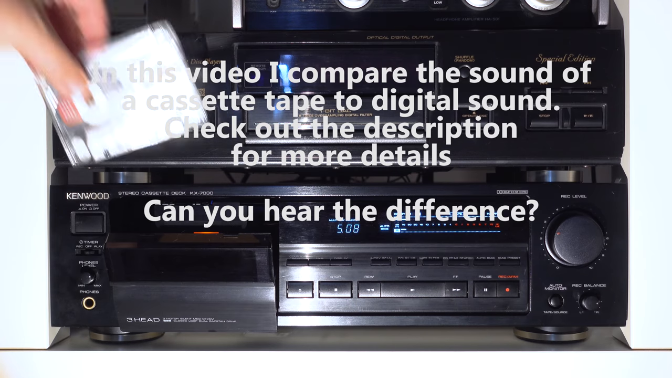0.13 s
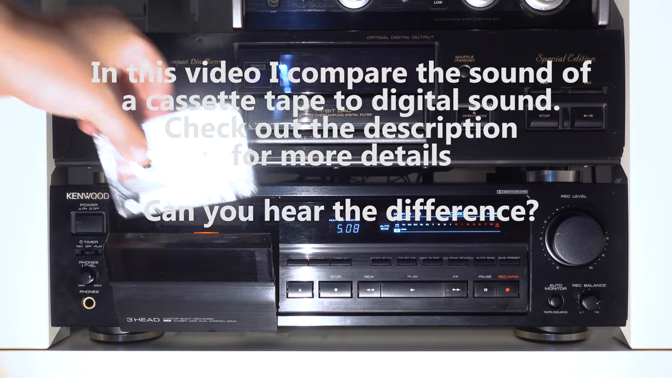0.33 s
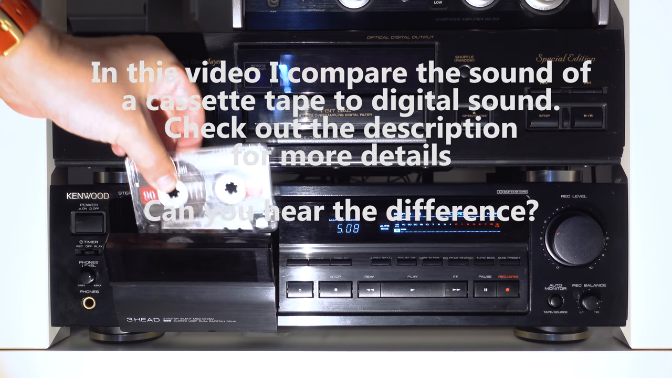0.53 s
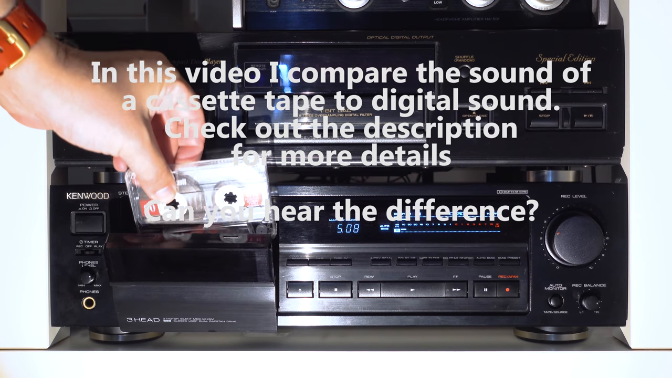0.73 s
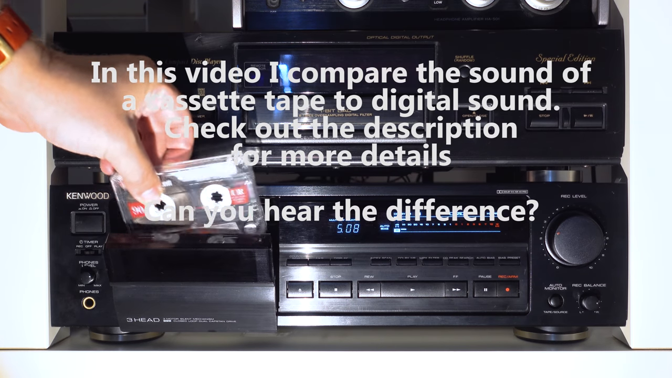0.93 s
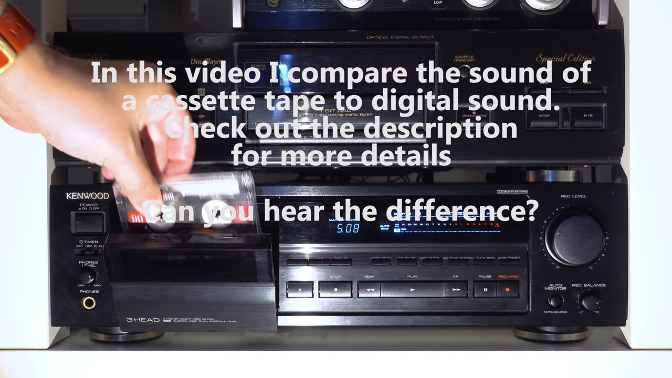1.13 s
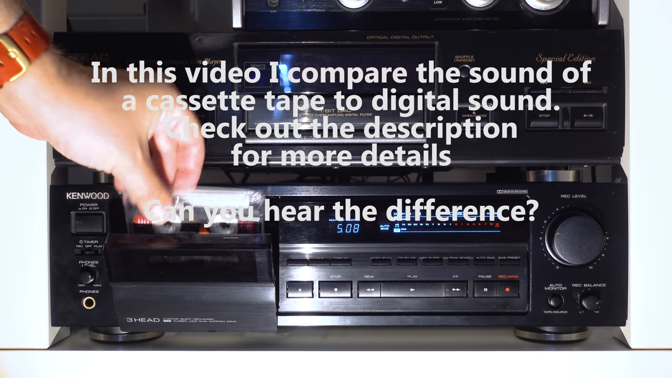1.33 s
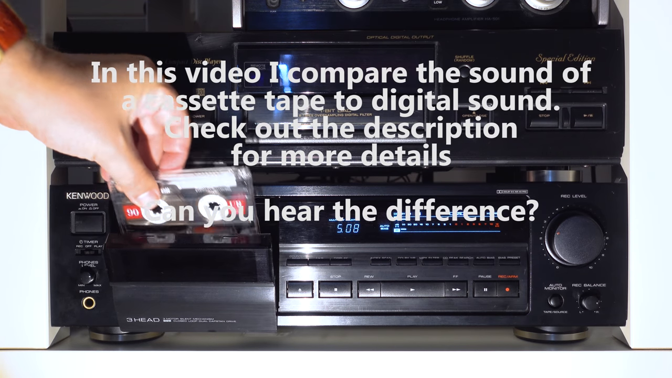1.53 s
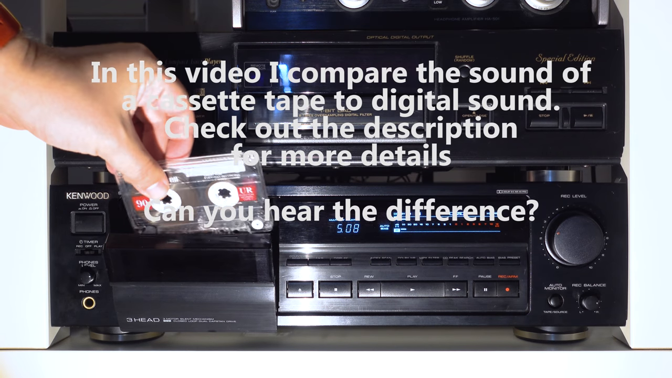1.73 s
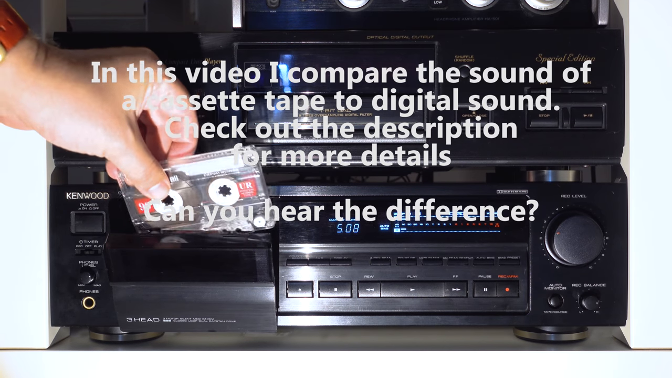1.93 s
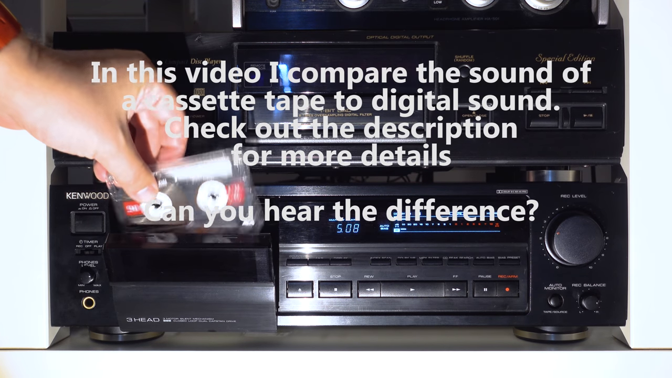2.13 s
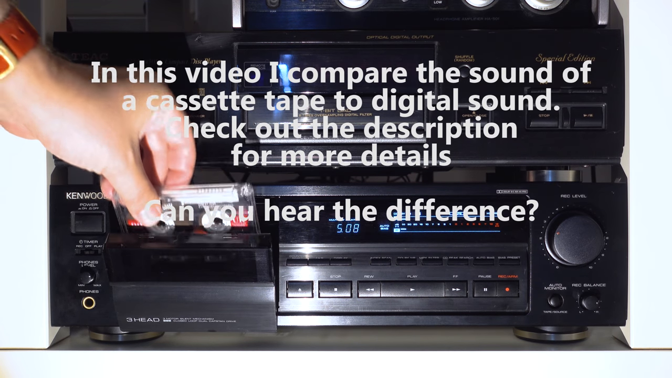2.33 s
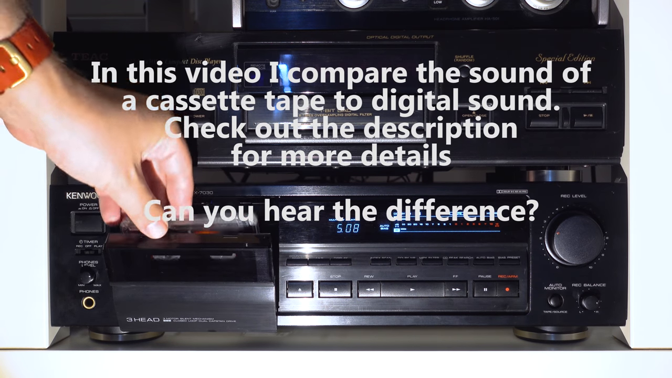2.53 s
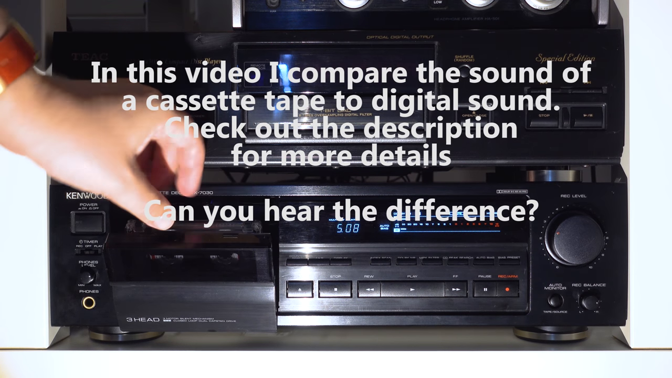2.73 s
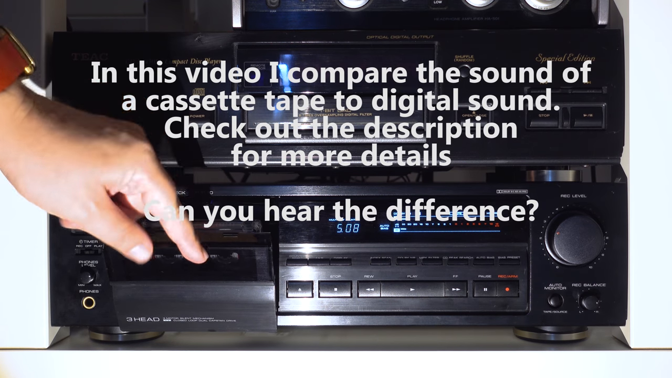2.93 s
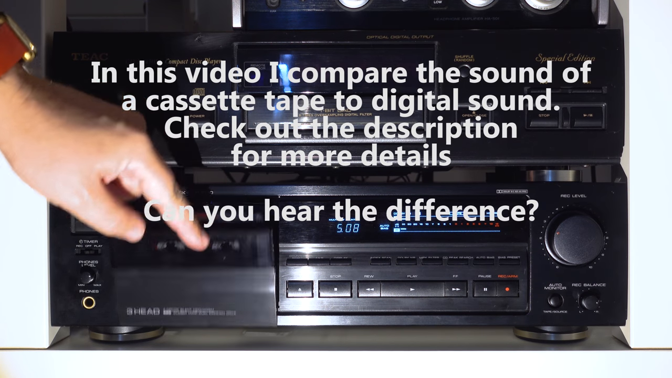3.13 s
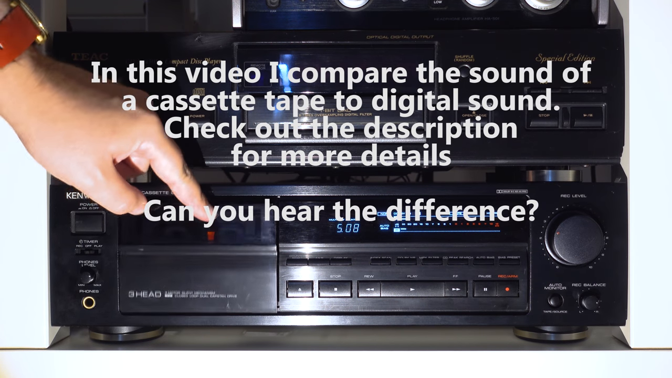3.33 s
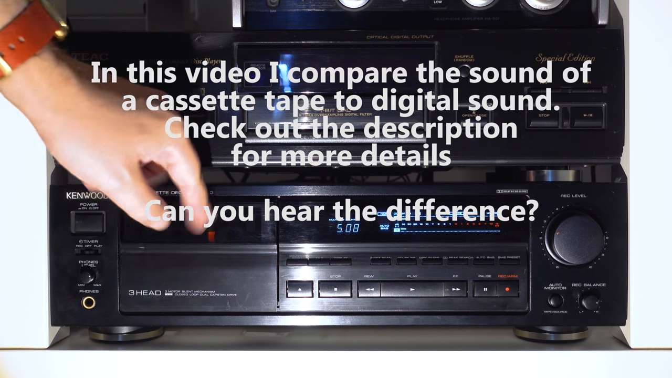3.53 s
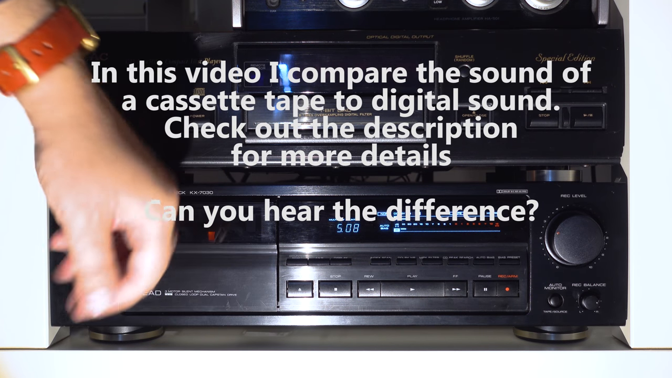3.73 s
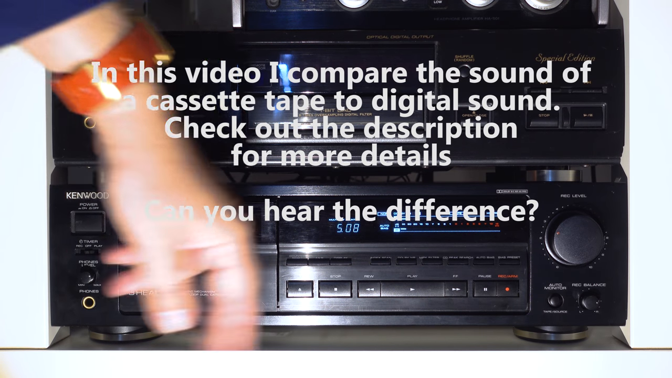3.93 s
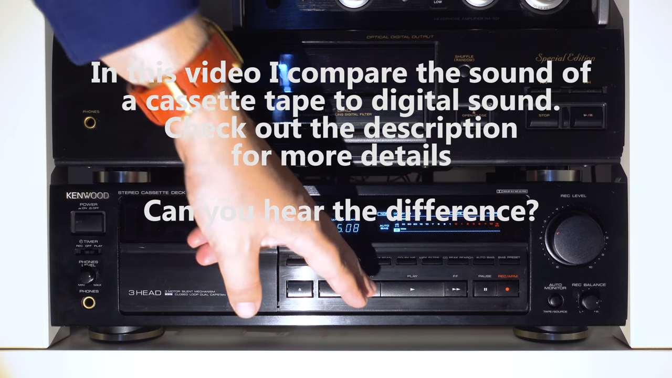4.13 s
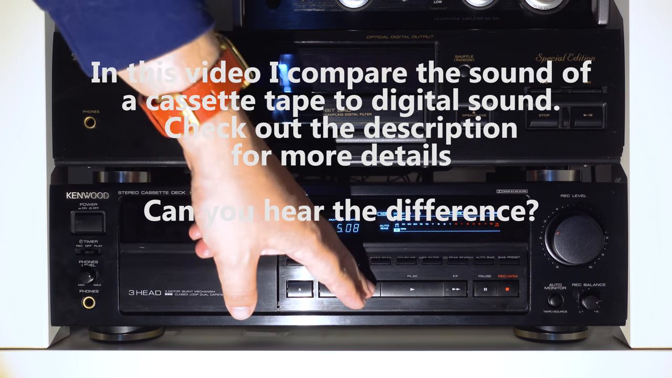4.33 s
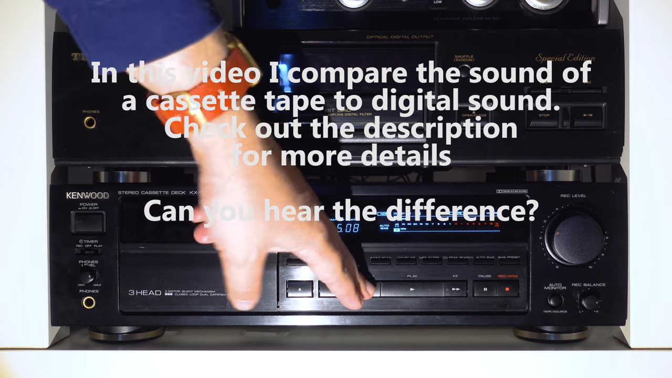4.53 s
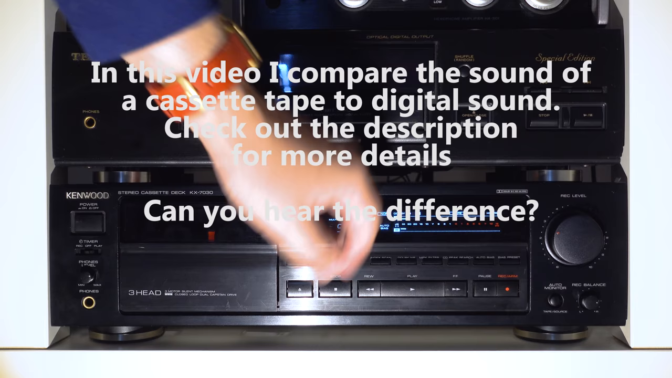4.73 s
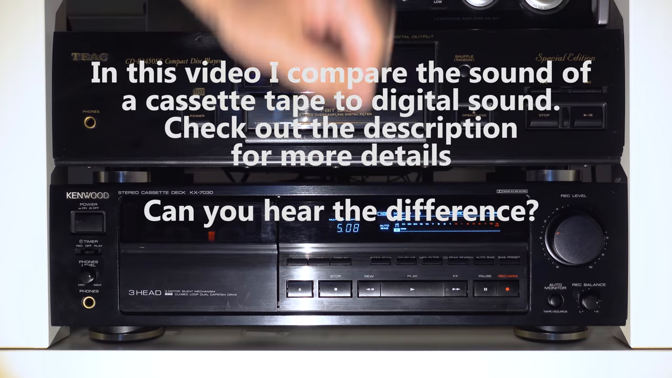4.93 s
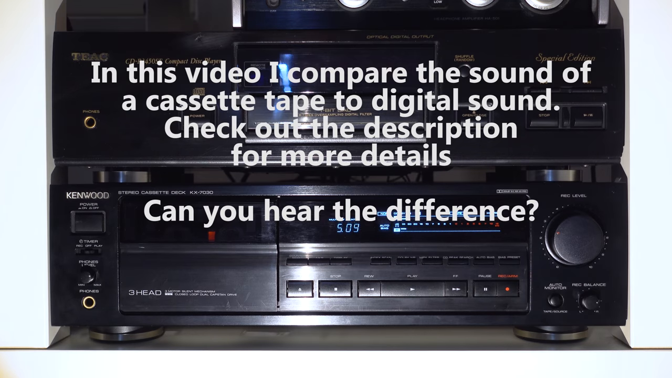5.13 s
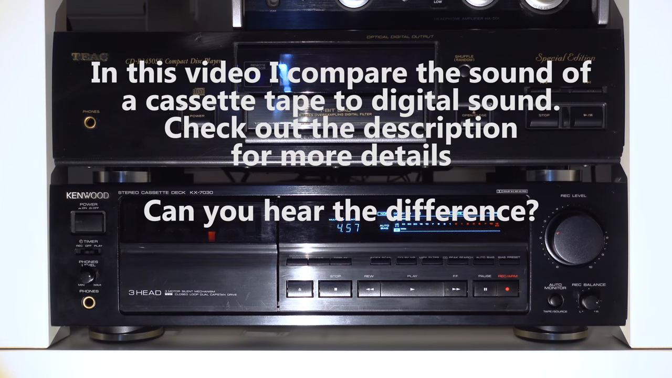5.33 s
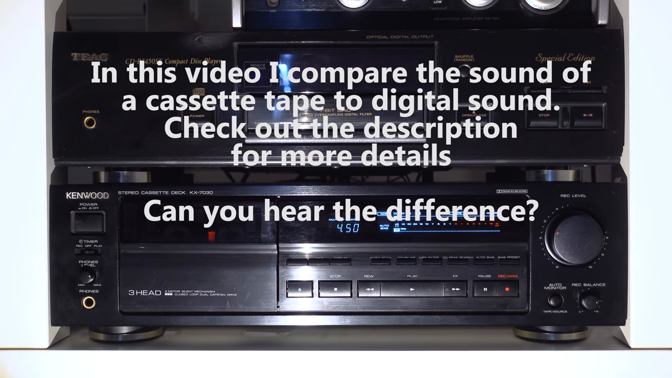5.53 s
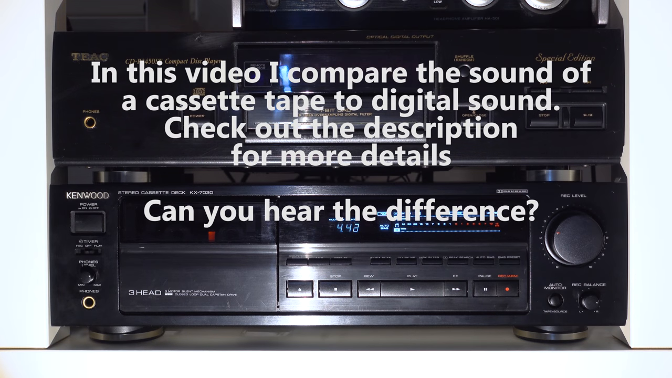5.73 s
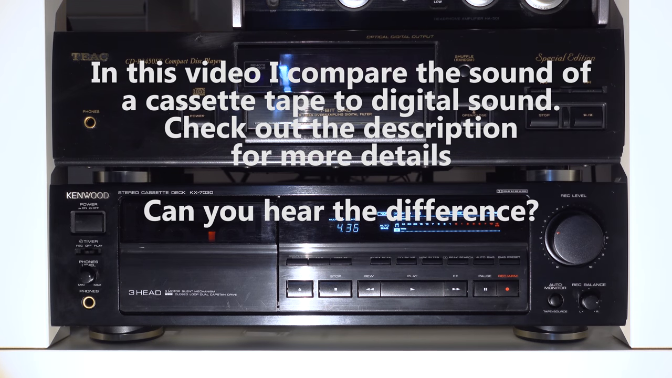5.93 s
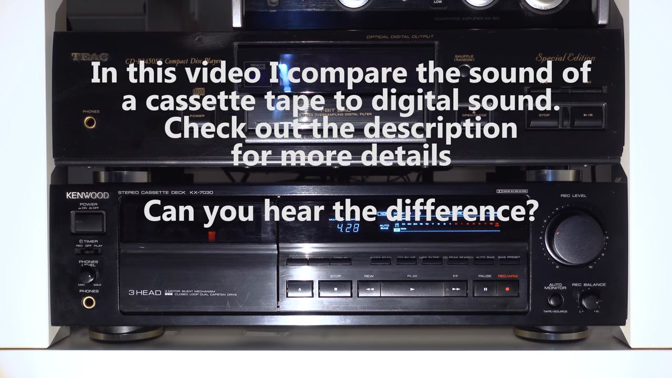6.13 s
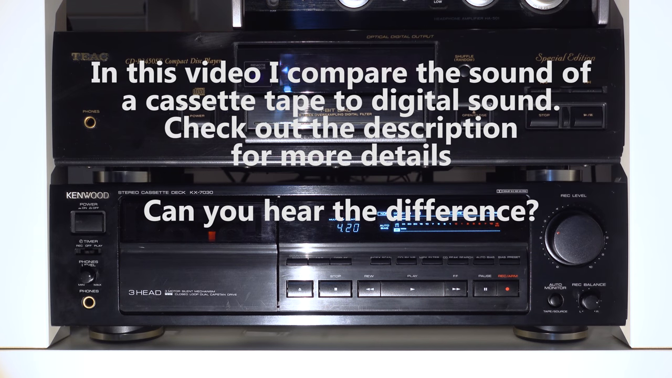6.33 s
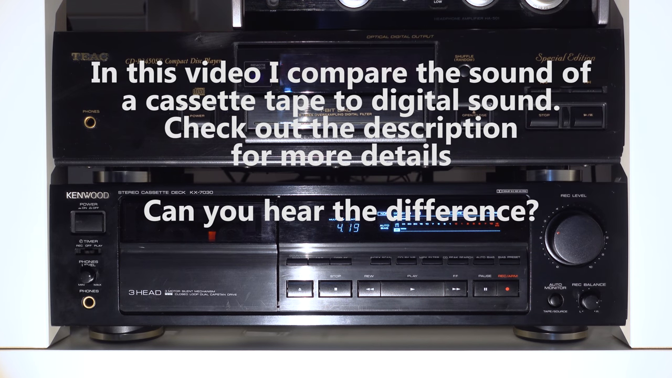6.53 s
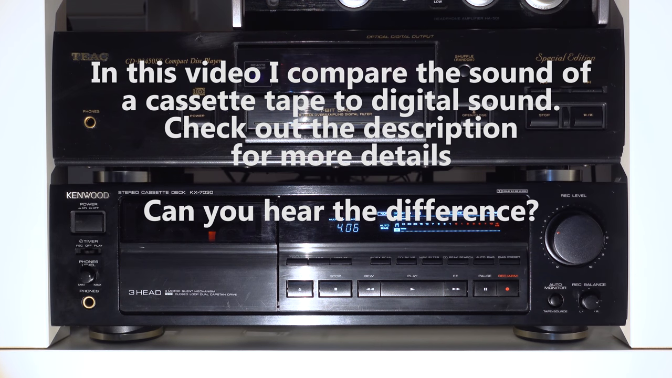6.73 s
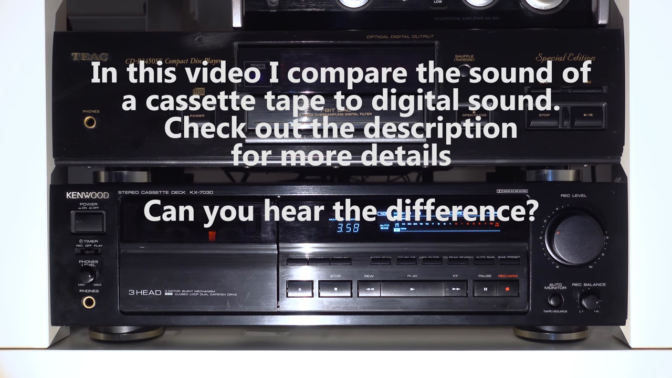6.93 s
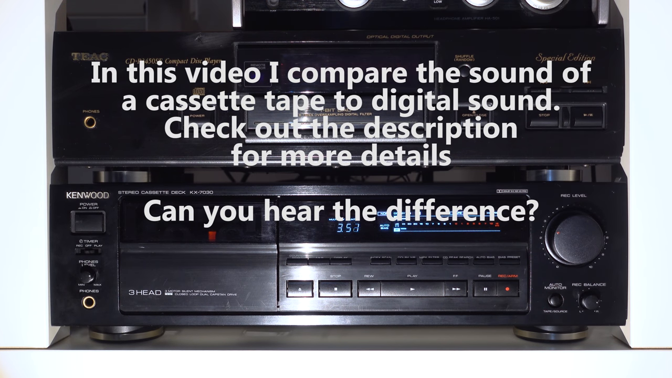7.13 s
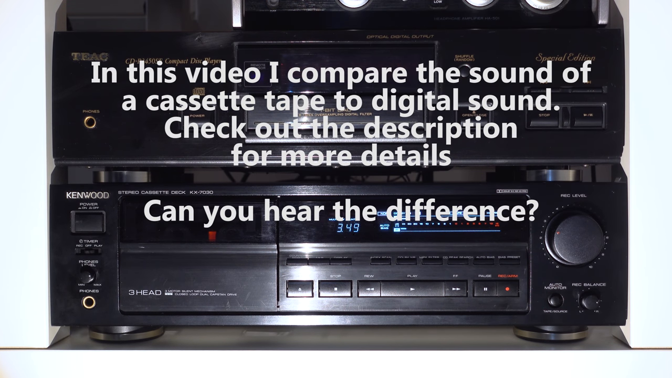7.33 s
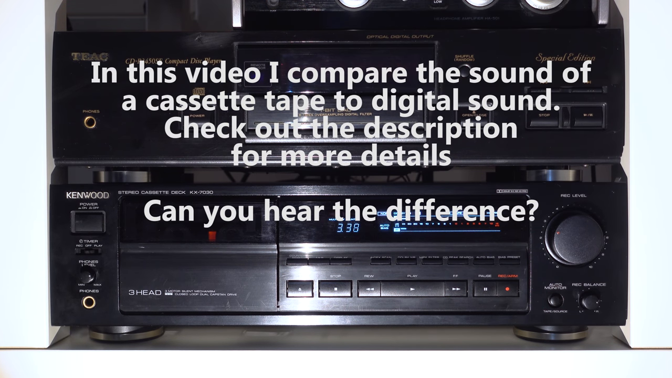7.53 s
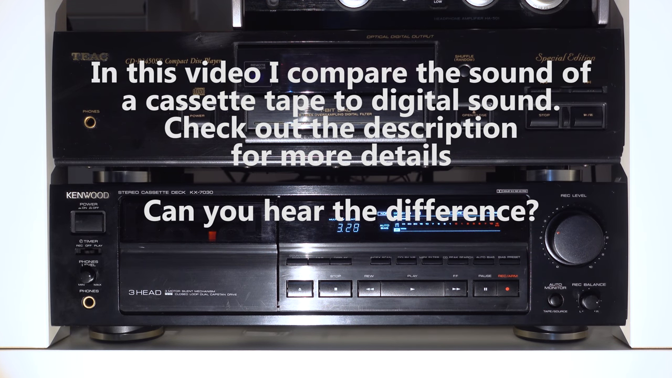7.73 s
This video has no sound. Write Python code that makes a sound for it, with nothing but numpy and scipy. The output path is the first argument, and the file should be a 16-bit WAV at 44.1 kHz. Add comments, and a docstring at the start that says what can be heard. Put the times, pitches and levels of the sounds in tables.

```python
"""Over a low room rumble, plastic scrapes, squeaks and knocks: a cassette is fumbled into a tape deck
in a bare, echoing room, heard at two close microphones; the door is pushed shut and its case rings.
A key clicks, the starting motor growls and the tape rewinds: gear teeth rattle, the loose reel knocks,
the tape swishes and sings, the motor groans, then hums. Blows are bursts of noise through resonances,
rubs and rattles are random tiny contacts in coloured filters, and whines, groan and hum are sines."""
import sys
import numpy as np
from scipy import signal
from scipy.fft import rfft, irfft, next_fast_len
from scipy.io import wavfile
from scipy.ndimage import uniform_filter1d

SR = 44100
rng = np.random.default_rng(int(sys.argv[2]) if len(sys.argv) > 2 else 0)


def materialize(psi):
    """Save the field psi as 16-bit PCM at rate SR to the path in sys.argv[1].

    A 1-D psi becomes a single channel; in a 2-D psi each row is a channel.
    """
    bounded = np.clip(np.atleast_2d(psi).T, -1, 1)
    quanta = np.round(bounded * 32767).astype(np.int16)
    wavfile.write(sys.argv[1], SR, quanta)


N = 343098
TIME = np.arange(N) / SR

# colour of the plastic shell, knocked or scraped: (f/Hz, relative level/dB)
SHELL_COLOUR = [(71, -64), (120, -24), (216, -10.5), (398, -14.5), (649, -4.5), (881, -8.5), (1690, -2),
                (2030, -8.5), (3730, -16), (5060, -23), (7160, -25), (15500, -37.5)]

# the motor runs up to speed, then creeps faster as the reel fills
MOTOR_START_S, SPIN_UP_S, CREEP_PER_S, FULL_SPEED_S = 4.99, 0.15, 0.014, 7.0
# the rattle, flicks and whines grow as a power of the run-up
WIND_DB, WIND_POWER = -35, 1.53


def amp(db):
    """Decibels to gain."""
    return np.exp(np.asarray(db) * (np.log(10) / 20))


def unit(x):
    """Scale to rms 1."""
    return x / np.sqrt(np.mean(x ** 2) + 1e-20)


def at_hz(points, hz):
    """Read a table on a log-frequency axis."""
    points = np.array(points)
    return np.interp(np.log(np.maximum(hz, 1)), np.log(points[:, 0]), points[:, 1])


def add(out, s, x):
    """Mix x into out from time s."""
    i = min(max(int(s * SR), 0), N)
    out[i:i + len(x)] += x[:N - i]


def cut(x, hz, kind, order=2):
    """Butterworth filter."""
    return signal.sosfilt(signal.butter(order, hz, kind, fs=SR, output="sos"), x)


def colour(x, spectrum, size=4096):
    """Causal (minimum-phase) filter with the given spectrum."""
    cepstrum = irfft(np.log(amp(at_hz(spectrum, np.fft.rfftfreq(size, 1 / SR)))))
    # fold the cepstrum onto positive time
    cepstrum[1:size // 2] *= 2
    cepstrum[size // 2 + 1:] = 0
    response = irfft(np.exp(rfft(cepstrum)))
    return signal.fftconvolve(x, response)[:len(x)]


def resonate(x, modes):
    """Parallel two-pole resonances, each with its gain on top."""
    out = 0
    for hz, width, db in modes:
        r = np.exp(-np.pi * width / SR)
        poles = [1, -2 * r * np.cos(2 * np.pi * hz / SR), r * r]
        out = out + amp(db) * (1 - r * r) / 2 * signal.lfilter([1, 0, -1], poles, x + 1e-18)
    return out


def narrow_noise(size, hz, width):
    """Noise through two resonances at one pitch, the second twice as wide; rms 1."""
    rung = resonate(rng.standard_normal(size), [(hz, width, 0)])
    return unit(resonate(rung, [(hz, 2 * width, 0)]))


def drift(rate):
    """Slow chance: random knots at the given rate per second, joined by lines; rms 1."""
    knots = rng.standard_normal(int(N / SR * rate) + 2)
    return unit(np.interp(TIME * rate, np.arange(len(knots)), knots))


def grains(per_s, spread_db):
    """Random tiny contacts of uneven size."""
    out = np.zeros(N)
    born = np.flatnonzero(rng.random(N) < per_s / SR)
    chance = rng.uniform(-1, 1, len(born))
    size_db = spread_db * np.minimum(-np.log(np.abs(chance)), 4)
    out[born] = np.sign(chance) * amp(size_db)
    return out


def stroke(start_s, length_s, attack_s, release_s):
    """Envelope: a straight rise, held until length_s is over, then a dying away."""
    t = TIME - start_s
    return np.clip(t / attack_s, 0, 1) * np.exp(-np.clip((t - length_s) / release_s, 0, 20))


def diffuse(size):
    """Sound from all sides at two close microphones: alike in the bass, unrelated in the treble."""
    # likeness of the two microphones: (f/Hz, left-right correlation)
    likeness = [(100, 0.99), (300, 0.99), (700, 0.84), (1400, 0.74), (2800, 0.38), (5000, 0.033),
                (15000, .05)]
    alike = np.clip(at_hz(likeness, np.fft.rfftfreq(size, 1 / SR)), -1, 1)
    mid, side = rfft(rng.standard_normal((2, size)))
    return irfft(np.sqrt(1 + alike) * mid + np.sqrt(1 - alike) * side * [[1], [-1]], size)


def room_response(build_s=0.0041, size=44100):
    """Echoes thicken over a few milliseconds and die away band by band."""
    # how long the room rings: (f/Hz, T60/s)
    room_t60 = [(100, 0.74), (250, 0.86), (600, 0.45), (1300, 0.83), (3000, 0.71), (6000, 0.72),
                (11000, 0.52), (16000, 0.34)]
    # colour of the echoes: (f/Hz, relative level/dB)
    room_gain = [(100, 2), (250, 5.5), (600, 2.5), (1500, -2), (4000, -0.5), (8000, -4), (15000, -2.5)]
    t, hz = np.arange(size) / SR, np.fft.rfftfreq(size, 1 / SR)
    field = rfft(diffuse(size)) * amp(at_hz(room_gain, hz))
    out = 0
    for k, (_, t60) in enumerate(room_t60):
        # bands overlap as triangles on the log-frequency axis
        share = at_hz([(row[0], j == k) for j, row in enumerate(room_t60)], hz)
        fade = amp(-60 * t / t60) * (1 - np.exp(-t / build_s))
        out = out + irfft(field * share, size) * fade / np.sqrt(2 * np.sum(fade ** 2))
    return out


def place(x, room, wet_db, lag, pan_db, wall_db, wall_s=0.00111):
    """Direct sound (lag in samples on the right), bright sideways echoes from the cabinet, and the room."""
    taps = np.arange(-8, 9)
    late = np.convolve(x, np.sinc(taps - lag) * np.hanning(len(taps)), "same")
    wall = amp(wall_db) * np.roll(cut(x, [3500, 10000], "band"), int(wall_s * SR))
    sides = np.array([[1], [-1]])   # left, right
    near = np.array([x, late]) * amp(sides * pan_db / 2) + sides * wall
    echoes = signal.fftconvolve(room.astype("f"), x[None].astype("f"), axes=1)[:, :N]
    return near + amp(wet_db) * echoes


def room_air():
    """Broad, coloured noise of the room, from all sides."""
    # colour of the quiet room: (f/Hz, relative level/dB)
    quiet = [(15, -51), (25, -14.5), (75, -10), (101, -12.5), (122, -16), (156, -16), (193, -19),
             (227, -14.5), (281, -24.5), (457, -25), (684, -31.5), (871, -22.5), (1450, -32.5),
             (1710, -32.5), (15500, -48.5)]
    field = diffuse(next_fast_len(N, True))
    air = [cut(colour(side[:N], quiet), 53, "high", order=3) for side in field]
    return amp(-54.5) * unit(np.array(air))


def room_hums():
    """Low standing hums: narrow bands of noise, the same at both microphones."""
    # hums of the room: (f/Hz, width/Hz, level/dB)
    hum_bands = [(33.8, 6.3, -70.5), (70.8, 3.1, -57.5), (221.6, 9.6, -67.5), (900, 330, -106)]
    return sum(amp(db) * narrow_noise(N, hz, width) for hz, width, db in hum_bands)


def slides():
    """Fingers slide the shell along the holder: grains of contact under short strokes of pressure."""
    # strokes along the holder and home: (t/s, length/s, level/dB)
    slide_strokes = [(0.004, 0.15, -58.5), (0.666, 0.17, -52), (1.408, 0.5, -53.5), (2.943, 0.14, -59),
                     (3.257, 0.37, -48.5)]
    pressure = sum(amp(db) * stroke(s, length, attack_s=0.018, release_s=0.13)
                   for s, length, db in slide_strokes)
    return pressure * unit(colour(grains(700, 0.63), SHELL_COLOUR))


def squeaks(size=16384):
    """Stick and slip rings one resonance of a plastic part for a moment."""
    # rubs and squeaks of plastic: (t/s, length/s, f/Hz, width/Hz, level/dB ahead of the arch)
    rubs = [(0.032, 0.14, 1710, 150, -53.5), (0.045, 0.0077, 1560, 675, -40.5),
            (1.16, 0.035, 2330, 350, -47), (1.189, 0.11, 1430, 300, -48), (1.2, .012, 8560, 1800, -49),
            (1.259, 0.009, 8800, 1800, -47), (1.234, .13, 8950, 1200, -67),
            (1.859, 0.0068, 1670, 403, -23.5), (2.253, 0.013, 3730, 496, -30.5),
            (2.437, 0.02, 3830, 457, -53), (2.538, 0.057, 1840, 120, -35.5),
            (3.368, 0.031, 1690, 500, -35.5), (4.642, 0.012, 5200, 600, -47.5),
            (4.781, 0.017, 2710, 600, -50)]
    out, t = np.zeros(N), np.arange(size) / SR
    for s, length, hz, width, db in rubs:
        arch = np.sin(np.pi * np.minimum(t / length, 1))
        add(out, s, amp(db) * narrow_noise(size, hz, width) * arch)
    return out


def chatter(t60, rise_s, size=6144, uneven=0.86):
    """One blow: loose plastic parts buzz together for a moment, favouring some pitches by chance."""
    t = np.arange(size) / SR
    fade = amp(-60 * t / t60) * (1 - np.exp(-t / rise_s))
    pitches = rfft(rng.standard_normal(size) * fade)
    # a power below 1 evens out the chance pitches a little
    buzz = irfft(np.abs(pitches) ** uneven * np.exp(1j * np.angle(pitches)))
    loudness = np.sqrt(np.abs(uniform_filter1d(buzz ** 2, size=192)) + 1e-12)
    return fade * buzz / loudness


def blows(hits, spectrum, modes, ring_db, rise_s, thud_db, clack_db, crack_db):
    """Each blow rings the part's modes and the spot it lands on, with its own thud, clack and crack."""
    out = np.zeros(N)
    for s, blow_db, thud, crack, t60, spot_hz in hits:
        contact = chatter(t60, rise_s)
        rings = amp(ring_db) * resonate(contact, modes) + resonate(contact, [(spot_hz, 120, 5)])
        body = colour(contact + rings, spectrum)
        bands = ((cut(body, 450, "low", order=4), thud + thud_db),
                 (cut(body, [450, 4000], "band"), clack_db),
                 (cut(body, 4000, "high", order=4), crack + crack_db))
        for band, db in bands:
            add(out, s, amp(blow_db + db) * unit(band))
    return out


def shell_knocks():
    """The plastic shell knocks against the holder and rings its own modes."""
    # knocks: (t/s, relative level/dB, thud trim/dB, crack trim/dB, contact T60/s, struck spot f/Hz)
    knocks = [(0.047, -33.5, -37, -20, 0.03, 1620), (0.128, -39.5, -20, -23, 0.039, 1580),
              (0.638, -14, -18.5, -19, 0.046, 1500), (0.691, -19.5, -18.5, -19.5, 0.076, 1440),
              (0.838, -20.5, -19, -13.5, 0.055, 2470), (0.978, -21.5, -15.5, -15, 0.046, 1830),
              (1.003, -24, -12, -14, 0.046, 945), (1.048, -27.5, -26, -18, 0.038, 1440),
              (1.165, -29, -33, -20, 0.17, 2330), (1.205, -35.5, -15.5, -20, 0.047, 1760),
              (1.262, -31.5, -24, -14, 0.031, 1790), (1.473, -26, -19.5, -15.5, 0.06, 1030),
              (1.51, -28, -27, -20, 0.03, 1030), (1.537, -25.5, -46, -18, 0.038, 1490),
              (1.615, -32.5, -9.5, -18.5, 0.04, 1430), (1.776, -27, -28, -25, 0.034, 1790),
              (1.789, -14.5, -21.5, -14, 0.12, 1630), (1.8, -14.5, -22, -31, 0.046, 1000),
              (1.836, -23, -16, -13, 0.045, 1740), (1.862, -26, -41, -13, 0.028, 1650),
              (2.133, -27, -17, -21.5, 0.077, 1010), (2.154, -21, -14.5, -17, 0.091, 1740),
              (2.233, -24, -25, -14.5, 0.13, 1025), (2.253, -9, -28, -13.5, 0.07, 1770),
              (2.267, -17, -17.5, -34, 0.026, 1660), (2.442, -34.5, -10, -2.5, 0.032, 3850),
              (2.53, -23.5, -27, -18, 0.11, 1800), (2.544, -16, -21, -18, 0.12, 1820),
              (2.567, -18, -22, -22, 0.025, 1770)]
    # resonances of the shell: (f/Hz, width/Hz, relative level/dB)
    modes = [(669, 6, -10.5), (1117, 96, -4), (1500, 29, -0.5), (1660, 150, -14.5), (2300, 290, -4.5),
             (2900, 190, -10), (3750, 44, -21), (6630, 200, -15)]
    return blows(knocks, SHELL_COLOUR, modes, ring_db=5.5, rise_s=0.00073,
                 thud_db=-17.5, clack_db=-23, crack_db=-14)


def door_blows():
    """The door takes the cassette, swings and latches, each blow ringing its modes."""
    # blows: (t/s, relative level/dB, thud trim/dB, crack trim/dB, contact T60/s, struck spot f/Hz)
    door_hits = [(2.767, -9, -21.5, -17, 0.057, 1780), (2.802, -16, -13.5, -20, 0.077, 900),
                 (3.029, -29, -16.5, -24, 0.041, 1630), (3.054, -42.5, -24.5, -2, 0.024, 1500),
                 (3.285, -39.5, -6, -11, 0.085, 1100), (3.333, -18.5, -21, -19.5, 0.091, 1150),
                 (3.378, -34, -29, -8, 0.035, 1800), (3.461, -8.5, -34, -18.5, 0.037, 1130),
                 (3.470, -15.5, -18.5, -5.5, 0.052, 2730), (3.497, -13.5, -14.5, -20, 0.12, 1240)]
    # colour of the door: (f/Hz, relative level/dB)
    spectrum = [(53, -50), (90, -11.5), (154, -15.5), (264, -8.5), (335, -10.5), (586, -11.5), (639, -7),
                (727, -5), (1170, -3.5), (1360, -6), (2090, -8.5), (11000, -19.5), (15500, -29)]
    # resonances of the door: (f/Hz, width/Hz, relative level/dB)
    modes = [(270, 50, 0), (641.5, 23, 1.5), (1200, 43, -12), (1770, 870, -6), (3270, 190, -8.5),
             (3780, 51, -14), (4570, 92, -20), (5460, 240, -36), (6030, 220, -13), (7400, 170, -16)]
    return blows(door_hits, spectrum, modes, ring_db=4.5, rise_s=0.0022,
                 thud_db=-13, clack_db=-21, crack_db=-11)


def steel_case(swell_s=0.0067):
    """The two hardest blows set the steel case panels swelling and ringing on as decaying sines."""
    # the blows: (t/s, relative level/dB)
    case_blows = [(2.772, -5), (3.468, -0.5)]
    # modes of the case: (f/Hz, relative level/dB, T60/s)
    case_modes = [(145, -69, 0.52), (188.7, -28.5, 0.33), (255.4, -48, 0.53), (268, -25, 0.3),
                  (300, -36, 0.67), (1130, -34.5, 0.99), (1204, -29, 0.63)]
    out, t = np.zeros(N), np.arange(SR) / SR
    for s, blow_db in case_blows:
        for hz, db, t60 in case_modes:
            fade = amp(blow_db + db - 60 * t / t60) * (1 - np.exp(-t / swell_s))
            add(out, s, fade * np.sin(2 * np.pi * (hz * t + rng.random())))
    return out


def shelf_push():
    """The push on the door shakes the shelf: a brief swell of low noise."""
    # colour of the shaken shelf: (f/Hz, relative level/dB)
    shelf = [(15, -19), (35, -6), (52, -20), (72, 2), (120, -16), (250, -20), (600, -50.5)]
    push = amp(-39.5) * stroke(3.22, length_s=0.065, attack_s=0.047, release_s=0.16)
    return push * unit(colour(rng.standard_normal(N), shelf))


def key_clicks():
    """The rewind key and the latches behind it click and ring their modes."""
    # clicks: (t/s, relative level/dB, thud trim/dB, crack trim/dB, contact T60/s, struck spot f/Hz)
    clicks = [(4.644, -35.5, -36, -12.5, 0.024, 3060), (4.788, -24, -37, -18, 0.041, 2280),
              (4.795, -26, -34, -15.5, 0.023, 1160), (5.039, -42.5, -6, -10, 0.049, 2880),
              (5.065, -48, 2, -7, 0.049, 690)]
    # colour of the key: (f/Hz, relative level/dB)
    spectrum = [(120, -38), (200, 2), (544, -20.5), (812, -11), (974, -18), (1150, -12), (1710, -9.5),
                (2700, -7.5), (3610, -18), (4330, -10.5), (15500, -25)]
    # resonances of the key: (f/Hz, width/Hz, relative level/dB)
    modes = [(860, 40, -3), (1150, 32, 6), (2280, 110, 0), (2660, 150, 2), (2810, 72, -9), (3060, 100, -6),
             (4230, 170, -4), (5200, 170, -24)]
    return blows(clicks, spectrum, modes, ring_db=2.5, rise_s=0.00099,
                 thud_db=-16.5, clack_db=-20, crack_db=-11)


def start_growl():
    """A low, rough growl as the motor starts after the key press: grains ring low resonances."""
    # resonances of the growl: (f/Hz, width/Hz, relative level/dB)
    growl_modes = [(217, 14, -6), (255, 15, 1), (317, 34, -1), (370, 45, -29.5), (690, 30, 6)]
    growl = unit(cut(resonate(grains(900, 4), growl_modes), 900, "low"))
    return amp(-53.5) * stroke(4.79, length_s=0.64, attack_s=0.022, release_s=0.11) * growl


def run_up():
    """How far the motor has come from rest to running speed, 0-1."""
    return 1 - np.exp(-np.maximum(TIME - MOTOR_START_S, 0) / SPIN_UP_S)


def speed():
    """Speed of the gears: the run-up times a slow creep that passes 1 at FULL_SPEED_S."""
    return run_up() * (1 + CREEP_PER_S * (TIME - FULL_SPEED_S))


def winding_force():
    """Gain of the rattle, the flicks and the whines."""
    return amp(WIND_DB) * run_up() ** WIND_POWER


def slaps(ratio, sharpness, uneven_db):
    """Force on a wheel that slaps once a turn, each time with a strength of its own."""
    # 71.1 turns a second at speed 1 and ratio 1
    turns = np.cumsum(71.1 * speed()) / SR * ratio
    strength = amp(uneven_db * rng.standard_normal(1000))[turns.astype(int)]
    return strength * np.exp(-sharpness / ratio * (turns % 1))


def tape_swish():
    """Tape always swishes a little on the guides, and at times rubs harder: grains of friction."""
    # harder rubs on a guide: (t/s, length/s, level/dB ahead of the flicker)
    tape_rubs = [(4.897, 0.096, -60), (5.444, 0.03, -55), (5.73, 0.48, -57)]
    # colour of the swish: (f/Hz, relative level/dB)
    swish_colour = [(5000, -0.5), (9000, -10), (11500, -1), (14500, -6.5), (16000, -30)]
    rubbing = amp(-68.5) * run_up()
    for s, length, db in tape_rubs:
        rubbing = rubbing + amp(db) * stroke(s, length, attack_s=0.027, release_s=0.076)
    flicker = amp(2.0 * drift(30))
    return rubbing * flicker * unit(colour(grains(8400, 3.5), swish_colour))


def tape_squeal(peak_s=6.04, length_s=0.75, top_hz=15100, sag_hz=4400, waver=0.015, scatter=0.035):
    """During the longest rub the tape sings, in one arch of wavering pitch and loudness."""
    off_peak = np.minimum((2 * (TIME - peak_s) / length_s) ** 2, 1)
    pitch = (top_hz - sag_hz * off_peak) * (1 + waver * drift(25) + scatter * drift(900))
    loudness = (1 - off_peak) * amp(-61 + 4.7 * drift(30))
    return loudness * np.sin(2 * np.pi * np.cumsum(pitch) / SR)


def tape_flicks():
    """Tape flicks the guides as the wheel tugs at it: pulsing grains ring the guides."""
    # resonances of the tape guides: (f/Hz, width/Hz, relative level/dB)
    guide_modes = [(6900, 380, -15), (7940, 110, 8.5), (10700, 570, 2.5), (13000, 3600, -21)]
    tug = slaps(0.94, sharpness=4, uneven_db=2)
    flapping = amp(4 * drift(25))
    flicks = unit(resonate(grains(4000, 2.0) * tug * flapping, guide_modes))
    return amp(-26) * winding_force() * flicks


def chassis(x):
    """What the transport's contacts sound like through the deck."""
    # colour of the deck: (f/Hz, relative level/dB)
    rattle = [(65, -47), (110, -14), (150, -17.5), (316, -8), (414, -16), (469, -22), (531, -13),
              (653, -13), (754, -10.5), (909, -7), (1430, -1.5), (5510, -28.5), (7830, -23.5), (8680, -32),
              (15500, -40)]
    # resonances of the chassis: (f/Hz, width/Hz, relative level/dB)
    chassis_modes = [(674, 12, 4.5), (1040, 17, -16), (1160, 74, -3.5), (1496, 66, -3.5), (1743, 140, -6),
                     (1927, 52, -9.5), (2540, 56, -2), (3520, 440, -10.5)]
    return colour(x + amp(4) * resonate(x, chassis_modes), rattle)


def gears(teeth_per_s=16000):
    """Two wheels slap, each at its own rate, amid the loose chatter of their teeth."""
    fast = slaps(0.99, sharpness=3.8, uneven_db=3.4)
    hub = slaps(0.606, sharpness=5, uneven_db=3.5)
    contacts = unit(fast * grains(teeth_per_s, 1.7))
    contacts = contacts + amp(-4) * unit(hub * grains(teeth_per_s, 1.4))
    contacts = contacts + amp(-7) * unit(grains(3000, 1.3))
    return amp(-3) * winding_force() * unit(chassis(unit(contacts)))


def whines(wow=0.0094, flutter_db=4, onset_power=0.86):
    """Whining tones of the transport, here made to follow the speed with a little wow."""
    # whining tones: (f/Hz at speed 1, relative level/dB)
    whine_tones = [(474, -55), (651, -49), (937, -48), (1130, -46.5), (1389, -59)]
    angle = 2 * np.pi * np.cumsum(speed() * (1 + wow * drift(60))) / SR
    tones = sum(amp(db + flutter_db * drift(50)) * np.sin(hz * angle) for hz, db in whine_tones)
    # they come up later than the rattle
    return amp(31) * winding_force() * run_up() ** onset_power * tones


def motor_tone(hz, unsteady, rate):
    """A sine at hz when the speed is 1, its pitch unsteady by chance."""
    return np.sin(2 * np.pi * np.cumsum(hz * speed() * (1 + unsteady * drift(rate))) / SR)


def motor_groan():
    """The reel motor groans roughly while it accelerates, loudest halfway up to speed."""
    strain = run_up() * (1 - run_up())
    return amp(-51) * strain / strain.max() * motor_tone(480, unsteady=0.172, rate=200)


def reel_knocks(rebound_s=0.044, settle_s=0.074, settle_loss_db=9):
    """The loose reel hits the shell, rebounds and settles: short, rounded clacks without bass."""
    # even runs, a knock a turn: (first t/s, last t/s, knocks, relative level/dB, rebound relative level/dB)
    knock_runs = [(5.194, 5.354, 2, -27, -26), (5.503, 5.934, 4, -20.5, -26.5),
                  (6.079, 6.362, 3, -20.5, -20), (6.546, 6.830, 3, -19, -22.5),
                  (7.013, 7.738, 5, -18.5, -22.5)]
    out = np.zeros(N)
    for first, last, count, db, rebound_db in knock_runs:
        taps = ((0, db), (rebound_s, rebound_db), (settle_s, db - settle_loss_db))
        for s in np.linspace(first, last, int(count)):
            for delay, tap_db in taps:
                clack = cut(chassis(chatter(t60=0.025, rise_s=0.00079)), 640, "high")
                add(out, s + delay, amp(tap_db - 23.5) * unit(clack))
    return cut(out, 5500, "low", order=1)


def motor_hum(start_s=6.3, grows_s=0.74):
    """The motor hums once the full reel loads it."""
    load = np.clip((TIME - start_s) / grows_s, 0, 1)
    return amp(-48) * load * motor_tone(92, unsteady=0.024, rate=10)


def scene():
    """Loading, key press and rewind in one room."""
    room = room_response()
    background = room_air() + room_hums() + shelf_push()
    cassette = slides() + squeaks() + shell_knocks() + door_blows()
    loading = place(cassette, room, wet_db=1.5, lag=0.83, pan_db=-0.3, wall_db=-2.0) + steel_case()
    tape = tape_swish() + tape_squeal() + tape_flicks()
    transport = key_clicks() + tape + gears() + reel_knocks()
    winding = place(transport, room, wet_db=2.5, lag=0.34, pan_db=-0.3, wall_db=-2.5)
    motors = start_growl() + motor_groan() + motor_hum()
    return background + loading + winding + whines() + motors


def record(dry):
    """The treble ends steeply at 16 kHz (elliptic low-pass)."""
    return signal.sosfilt(signal.ellip(12, 0.1, 80, 16000, fs=SR, output="sos"), dry)


dry = scene()
out = record(dry)
materialize(out)
```